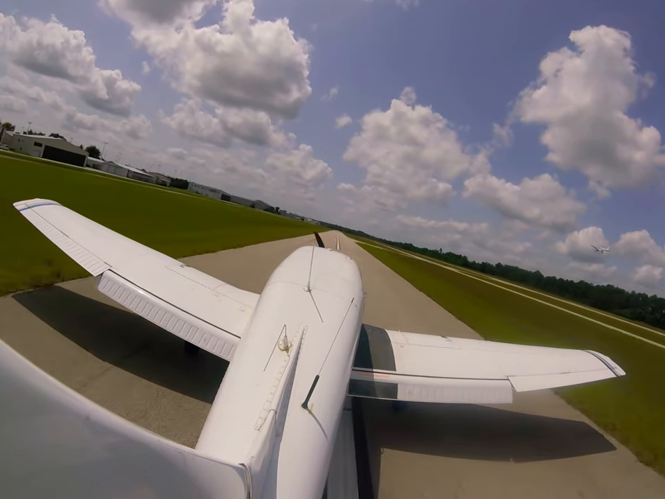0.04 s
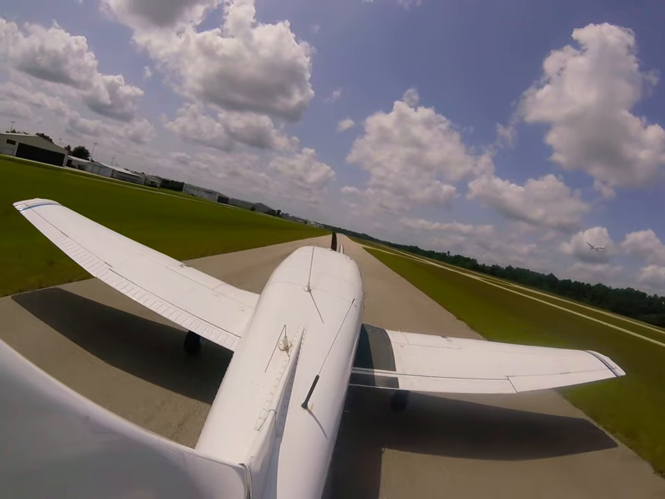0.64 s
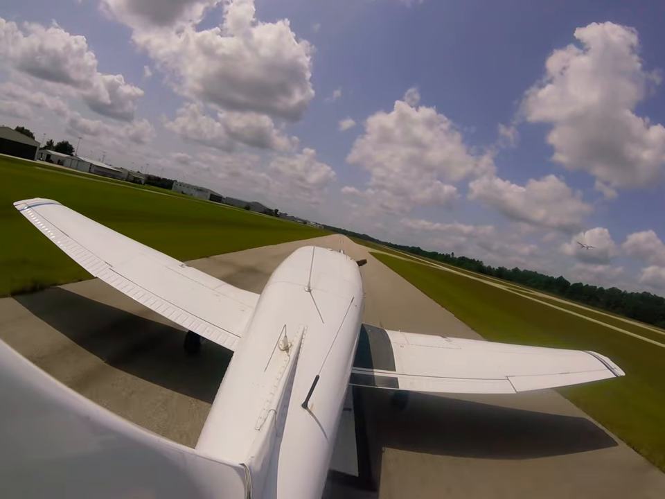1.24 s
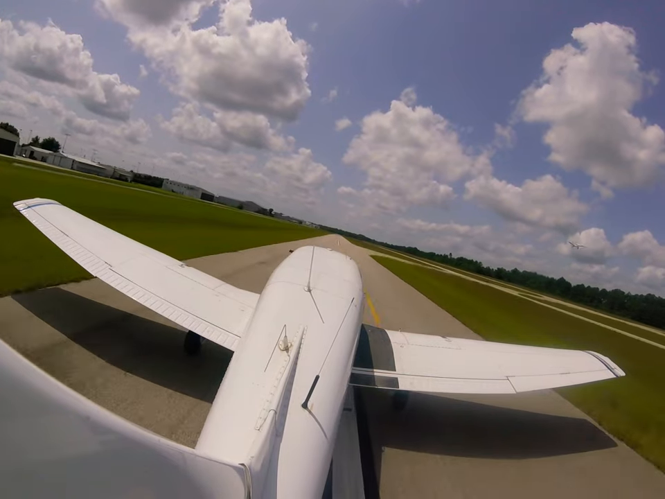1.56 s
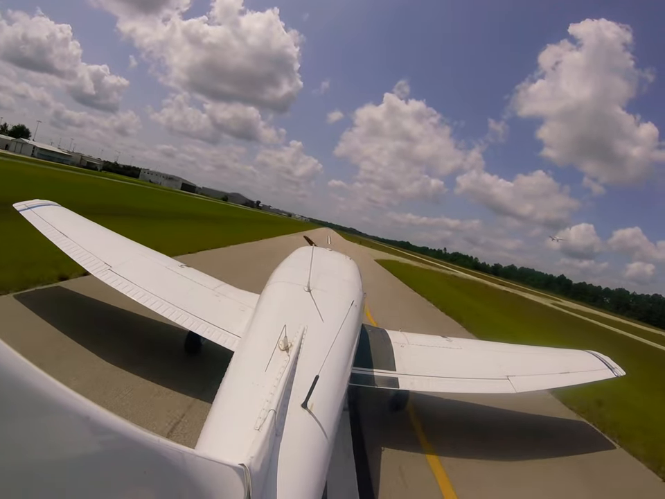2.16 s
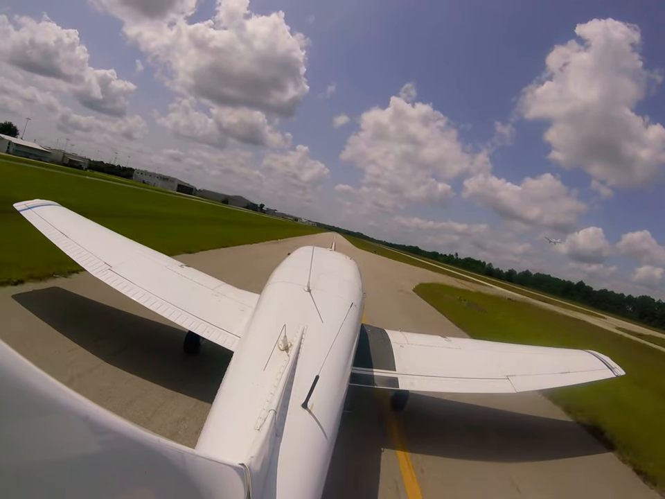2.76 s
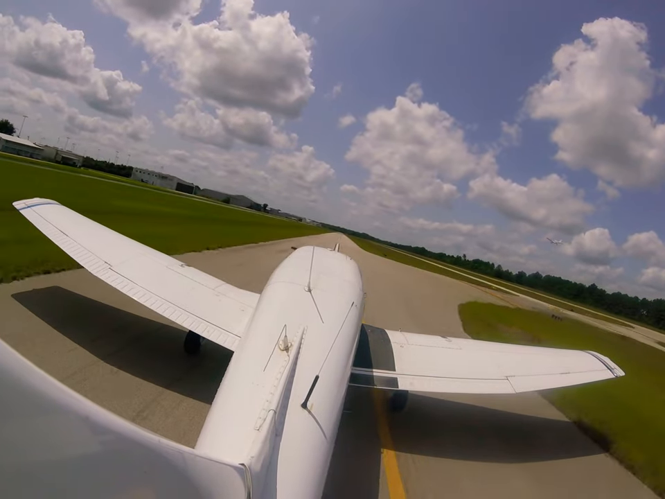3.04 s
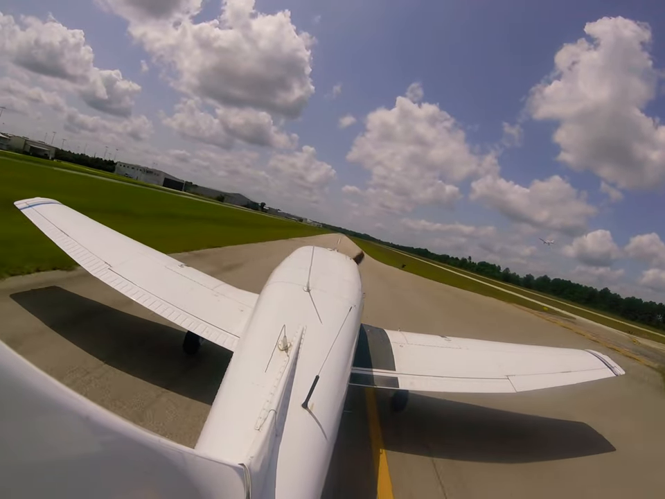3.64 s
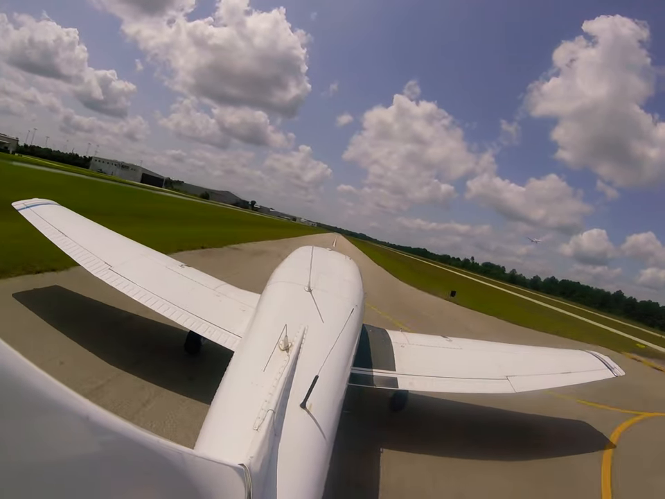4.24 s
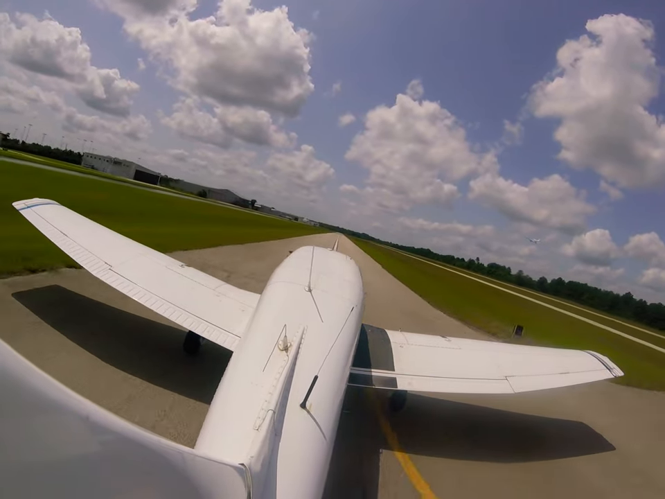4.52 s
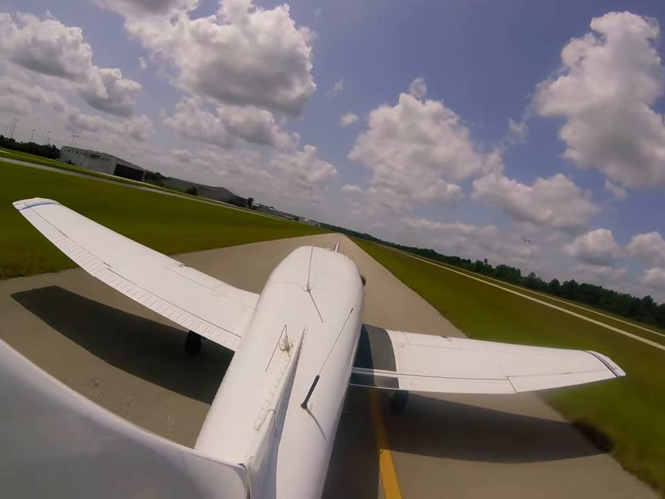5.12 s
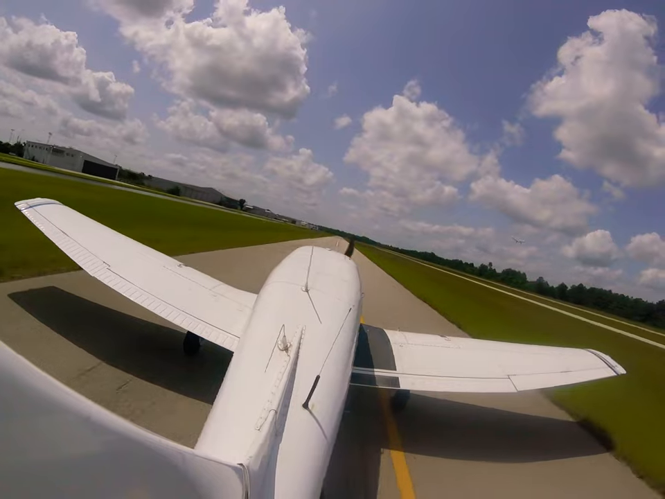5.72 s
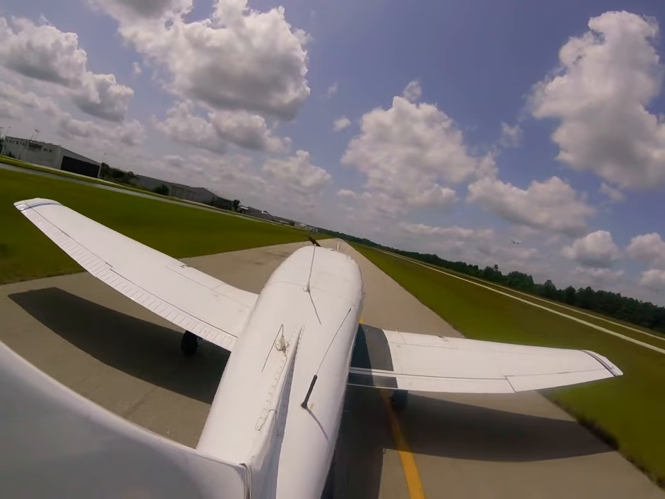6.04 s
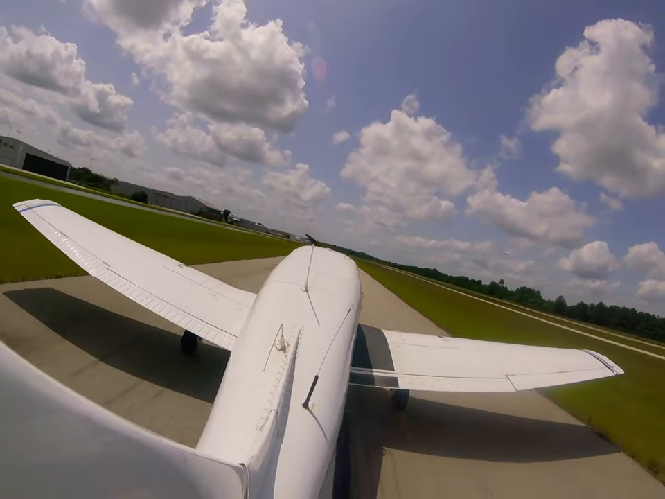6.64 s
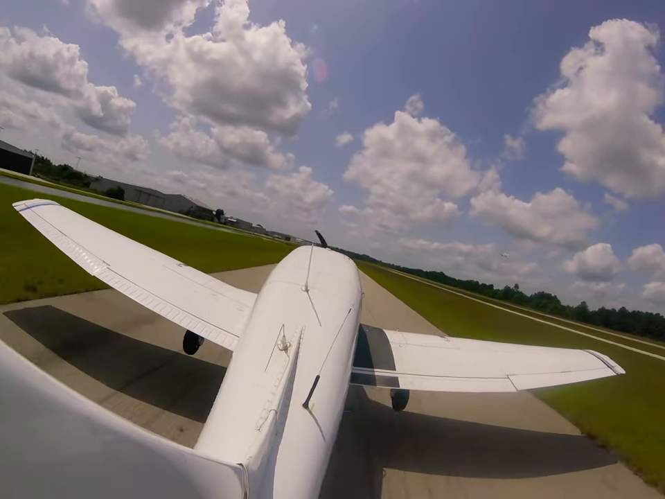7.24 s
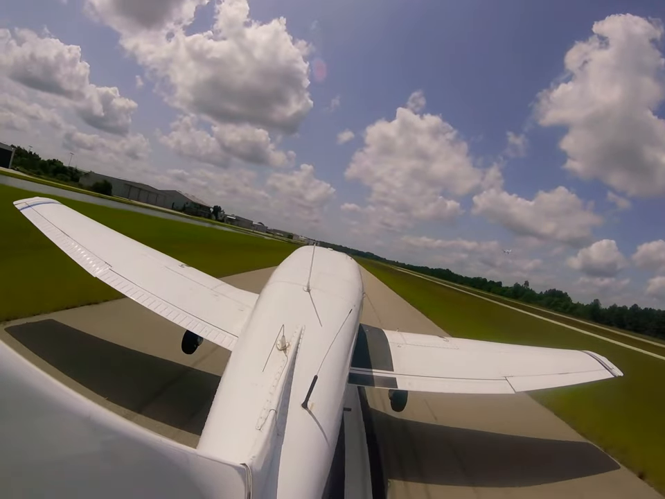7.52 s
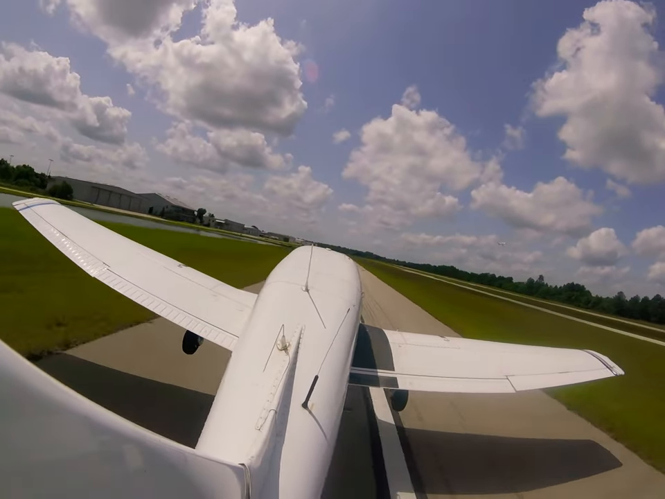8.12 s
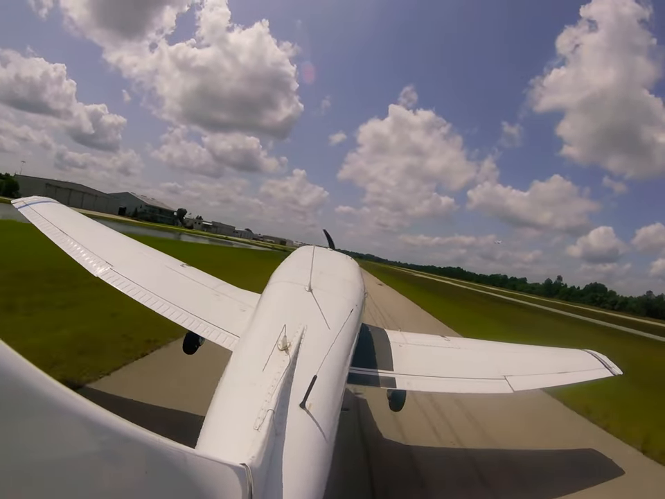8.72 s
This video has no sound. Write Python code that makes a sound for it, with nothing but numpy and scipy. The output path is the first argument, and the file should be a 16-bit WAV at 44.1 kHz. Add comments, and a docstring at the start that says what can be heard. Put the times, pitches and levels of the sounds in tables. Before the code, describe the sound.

Wind from a light plane's propeller rumbles and buffets the microphone, the engine droning underneath, until the slaps become a rapid flutter.

```python
"""On a runway, aboard a rolling light plane: one microphone on the tail, right in the propeller wash.
The wash roars past and the engine drones underneath. The swirl shed by each blade slaps the microphone:
at first only now and then, from about 6 s on almost every pass, as a hard flutter. Hard slaps crackle,
the airframe ticks faintly, and once the rushing air takes on a hollow pitch."""
import sys
import numpy as np
from scipy import signal
from scipy.fft import rfft, irfft, next_fast_len
from scipy.io import wavfile
from scipy.ndimage import uniform_filter1d

SR = 44100
rng = np.random.default_rng(int(sys.argv[2]) if len(sys.argv) > 2 else 0)


def store_wav(level_fs):
    """Save 16-bit WAV to argv[1]."""
    pcm = np.round(np.clip(np.atleast_2d(level_fs), -1, 1) * 32767)
    wavfile.write(sys.argv[1], SR, pcm.T.astype(np.int16))


N = 395577
TIME = np.arange(N) / SR

# roar of the wash at the tail: t/s, relative level/dB, share of the full, throaty kind/0-1
WASH_ROAR = [(0, -16, .6), (.06, -17, .6), (.13, -18, 0.61), (0.87, -16.5, 0.94), (1.17, -17.5, 0.72),
             (1.26, -19, 0.75), (1.32, -17, .9), (1.45, -18.5, .9), (1.75, -18, 0.81), (1.765, -22.5, 0.93),
             (1.8, -25, .93), (1.84, -20.5, 1), (1.91, -23.5, 1), (1.94, -20.5, 0.98), (2, -22, 0.89),
             (2.2, -19.5, 0.68), (2.31, -19, 0.85), (2.42, -23, 0.92), (2.475, -27.5, 0.8),
             (2.85, -28.5, 0.52), (3.25, -26, 0.28), (3.95, -29, 0.61), (4.15, -24.5, .5),
             (4.35, -30.5, 0.9), (4.8, -30.5, 0.76), (4.93, -27.5, .6), (5.12, -29, 0.55),
             (5.38, -24, 0.57), (5.62, -30.5, 0.44), (5.87, -32, 0.18), (6.2, -26, 0.094),
             (6.45, -29.5, .02), (6.68, -25.5, 0.019), (7.05, -29.5, 0.037), (7.65, -29, 0.045),
             (8.96, -26.5, 0.083)]
# swirls that hit the microphone squarely: t/s, slap level/dB, relative level of the hiss burst/dB
BUFFETS = [(1.744, -5.5, -34), (1.8082, -1, -23), (1.8282, -8.5, -38), (1.8505, -5.5, -33),
           (1.8568, -7, -38), (1.877, -5, -37), (1.9337, 0.5, -34), (2.375, -9.5, -45), (2.4215, -2.5, -46),
           (2.5116, -4.5, -29), (2.5259, -1.5, -29), (2.54, -6.5, -30), (2.628, -1.5, -24.5),
           (2.655, -6.5, -28), (2.6715, -3.5, -30), (2.686, -10.5, -39), (2.7133, -4.5, -40),
           (2.741, -3, -27), (2.782, -11, -49), (3.3166, -10, -35), (3.3695, -4.5, -39),
           (3.3964, -4.5, -42), (3.4954, -2, -35), (3.5192, -8, -40), (3.568, -7, -47), (3.5948, -2, -27),
           (3.6429, -2.5, -29), (3.6686, -6, -39), (3.6937, -4, -38), (3.7184, -4.5, -47),
           (3.7915, -5.5, -38), (3.8509, -3.5, -39), (3.8908, -3.5, -31), (3.939, -4, -29),
           (3.987, -3.5, -35), (4.0132, -9, -42), (4.0372, -6.5, -31.5), (4.085, -10.5, -34),
           (4.134, -5, -27), (4.182, -10.5, -28), (4.2287, -3, -26.5), (4.263, -8.5, -31),
           (4.302, -9, -28.5), (4.4923, -7.5, -45), (4.543, -5, -37), (4.5667, -3, -32.5),
           (4.59, -7.5, -42), (4.685, -13.5, -43), (4.855, -7.5, -43), (5.3454, -8.5, -37),
           (5.3867, -7.5, -34), (5.412, -6, -37), (5.444, -11, -38), (5.506, -10, -35), (5.5294, -6, -39),
           (5.5786, -0.5, -33), (5.6246, -8, -43), (5.6503, -4.5, -26), (5.6734, -3, -28),
           (5.6971, -3, -30), (5.7091, -3, -32.5), (5.7235, -4, -35), (5.749, -8.5, -29.5), (5.77, -2, -28),
           (5.842, -9, -45), (5.8645, -12.5, -45), (5.899, -8.5, -36), (5.9138, -7, -28),
           (5.9366, -.5, -28.5), (5.9478, -3.5, -35), (5.9614, -4, -39), (5.9855, -1.5, -36),
           (6.0327, -4, -30), (6.057, -1, -27), (6.0803, -5, -29.5), (6.1514, -5.5, -36),
           (6.1734, -5, -32.5), (6.1978, -2.5, -37), (6.471, -5.5, -30), (6.662, -2.5, -28),
           (6.89, -2.5, -32), (6.9735, -1.5, -30), (6.9854, -4.5, -31), (7.058, -3.5, -33),
           (7.0812, -4, -34), (7.2145, -2.5, -36), (7.3685, -3, -32), (7.392, -4.5, -34), (7.44, -4.5, -31),
           (7.4635, -3, -33), (7.7031, -6, -34), (7.8466, -4.5, -36), (7.8939, -2, -29),
           (8.2249, -3.5, -35), (8.6776, -3.5, -29), (8.7493, -3, -31)]


def gain_of(db):
    """Decibels to amplitude."""
    return 10 ** (np.asarray(db) / 20)


def unit_rms(x):
    """Scales to rms 1."""
    return x / np.sqrt(np.mean(x ** 2) + 1e-20)


def curve(rows, column=1, at=TIME):
    """One column of a table, joined by straight lines in time."""
    rows = np.asarray(rows)
    return np.interp(at, rows[:, 0], rows[:, column])


def coloured(x, spectrum):
    """Filters by a spectrum (f/Hz, level/dB), keeping the power of white noise."""
    size = next_fast_len(N + 4096)
    hz = np.fft.rfftfreq(size, 1 / SR)
    points_hz, db = np.transpose(spectrum)
    response = gain_of(np.interp(np.log(hz + 1), np.log(points_hz), db))
    return irfft(rfft(x, size) * unit_rms(response), size)[:N]


def wander(rate_hz):
    """Smooth random motion of rms 1, up to about the given rate."""
    size = 2 ** 19
    hz = np.fft.rfftfreq(size, 1 / SR)
    spectrum = rfft(rng.standard_normal(N), size) / (1 + (hz / rate_hz) ** 4)
    return unit_rms(irfft(spectrum)[:N])


def add_centred(mix, s, sound):
    """Adds a sound centred on time s."""
    start = round(s * SR) - len(sound) // 2
    part = mix[max(start, 0):max(start + len(sound), 0)]
    part += sound[max(-start, 0):][:len(part)]


def shaft_turns(blade_s=6.1748):
    """Turns of the propeller, counted from a moment when the stronger blade's swirl arrives."""
    shaft_speed = [(0, 42), (2.3, 36), (3.8, 40.9), (5.4, 41.4), (6, 42.1), (6.55, 42.05), (7, 41.6),
                   (7.4, 42), (7.7, 41.7), (8, 42.35), (8.3, 42), (9, 42)]  # propeller rotation: t/s, f/Hz
    turns = np.cumsum(curve(shaft_speed)) / SR
    return turns - np.interp(blade_s, TIME, turns)


def engine_drone(turns, waver_db=2, wobble_turns=.083):
    """Low orders of the engine and propeller up front; the louder the wash, the more it bends them."""
    shaft_orders = [(1, -14.5), (2, 5.5), (3, 3.5), (4, -3.5), (5, -19.5), (6, -28.5)]  # partials: multiple of the shaft speed, relative level/dB
    tone_levels = [(0, -33, -8), (0.7, -25.5, -18), (1.2, -17.5, -21), (1.5, -17, -12), (1.8, -37, -1),
                   (2.6, -29, -16.5), (3.3, -21.5, -10), (3.6, -29.5, 7), (4.25, -28, 6), (4.38, -28, -10),
                   (4.75, -23, -3), (4.92, -19, 4), (5.04, -23, -3), (5.15, -19, -6), (5.4, -17, 2),
                   (5.9, -36.5, 0), (6.25, -31, -1), (7.25, -29.5, -3), (7.6, -35, 0), (9, -34, 4)]  # drone: t/s, level/dB, blade unevenness on the odd orders/dB
    wobble = wobble_turns * gain_of(1.2 * (curve(WASH_ROAR) + 18))
    bent = turns + wobble * wander(12)
    uneven_db = curve(tone_levels, column=2)
    orders = [(round(k), gain_of(db + round(k) % 2 * uneven_db)) for k, db in shaft_orders]
    tone = sum(size * np.sin(2 * np.pi * k * bent) for k, size in orders)
    rms = np.sqrt(sum(size ** 2 for _, size in orders) / 2)
    return tone / rms * gain_of(curve(tone_levels) + waver_db * wander(37))


def propeller_wash(slaps, bursts, gust_hz=40, swell_hz=5, grain_hz=400):
    """Turbulent air on the microphone: gusts shake it, tiny eddies roughen the hiss, big ones thump."""
    hiss_levels = [(0, -33), (0.3, -36.5), (0.68, -33.5), (1, -35.5), (1.25, -36), (1.75, -36.5),
                   (1.775, -45), (1.8, -41), (1.85, -41.5), (2, -37.5), (2.33, -38), (2.49, -44.5),
                   (2.85, -45), (3.3, -39.5), (3.8, -44.5), (4.08, -46), (4.15, -42), (4.24, -46),
                   (4.4, -46.5), (5.42, -40.5), (5.55, -42), (5.61, -49), (5.7, -38), (5.84, -46.5),
                   (6.13, -43), (6.26, -33.5), (6.45, -44), (6.49, -35.5), (6.66, -33.5), (6.85, -36.5),
                   (7.13, -42.5), (7.3, -35), (7.6, -46.5), (8.03, -35), (8.22, -41), (8.42, -37.5),
                   (8.6, -43), (8.96, -37.5)]  # hiss of the wash at the tail: t/s, relative level/dB
    rumble_levels = [(0, -23.5), (.34, -19), (.6, -20.5), (1.4, -17), (1.68, -19), (1.85, -21.5),
                     (2.1, -23.5), (2.74, -19.5), (2.8, -27), (3.1, -23), (3.35, -21), (3.7, -21.5),
                     (4.05, -22.5), (4.25, -20.5), (4.4, -26.5), (5.2, -27.5), (5.52, -18.5), (5.61, -32.5),
                     (5.7, -19), (5.83, -22.5), (6.2, -20), (7.1, -18.5), (7.4, -20.5), (8.2, -21.5),
                     (8.96, -21)]  # big eddies on the microphone: t/s, level/dB
    gustiness = [(0, 0.5), (2.3, .65), (2.6, 1)]  # the wash turns gusty as it thins: t/s, flicker depth/0-1
    # spectra of the rumble, the two kinds of roar and the hiss: f/Hz, relative level/dB
    rumble_colour = [(10, -34), (22, -12), (38, 6), (60, 1.5), (100, 2.5), (170, -2.5), (260, -6),
                     (400, -18.5), (900, -39), (3000, -87.5)]
    throaty_colour = [(20, -27), (100, -0.5), (190, 2), (350, -1), (600, -2), (1000, -8), (1500, -14.5),
                      (2000, -19.5), (3000, -31), (4200, -47), (9000, -88)]
    thin_colour = [(20, -20), (100, 4), (200, -7.5), (400, -1.5), (600, -5), (900, -7.5), (1500, -17),
                   (2000, -27), (3000, -37), (4200, -54), (9000, -81.5)]
    hiss_colour = [(100, -17.5), (500, -1.5), (1000, 5.5), (2000, 1.5), (3000, -5.5), (3700, -11),
                   (4250, -15.5), (5200, -9.5), (6000, -15), (7200, -22), (9000, -37), (10200, -43.5),
                   (12000, -64)]
    low, mid, high = rng.standard_normal((3, N))
    gust = wander(gust_hz) * curve(gustiness)
    swell = wander(swell_hz)
    trail = rough_air()

    roar = np.hypot(gain_of(curve(WASH_ROAR) + 2), trail * gain_of(-25)) * gain_of(1.32 * gust)
    stir = gain_of(-16) * uniform_filter1d(abs(slaps), size=90)  # each swirl stirs up turbulence
    roar = mid * np.hypot(roar, stir)
    throaty = np.clip(curve(WASH_ROAR, column=2), 0, 1)
    roar = coloured(roar * throaty, throaty_colour) + coloured(roar * (1 - throaty), thin_colour)

    hiss = np.hypot(gain_of(curve(hiss_levels) + 5), trail * gain_of(-33.5))
    hiss *= gain_of(1.6 * gust + .12 * swell)
    hiss = high * np.hypot(hiss, bursts * gain_of(2)) * gain_of(1.92 * wander(grain_hz))

    rumble = np.hypot(gain_of(curve(rumble_levels)), trail * gain_of(-23.5))
    rumble *= low * gain_of(2.5 * gust + 3 * swell)
    return coloured(rumble, rumble_colour) + roar + coloured(hiss, hiss_colour)


def swirls(rows, puff_s=.0025, suction=.66, suction_width=.85, release=1.01, soft_hz=4000, drain_hz=13):
    """Vortices (t/s, slap size, hiss size) suck, then push; gives the slaps and their hiss envelope."""
    breadth = [(1.8, 0.0006), (1.93, .00075), (2.45, 0.0012), (2.712, 0.0016), (2.741, 0.0024),
               (2.782, .0013), (3.6, 0.0015), (4.2, .0012), (4.55, 0.0014), (6.2, 0.0013), (6.72, 0.002),
               (6.95, 0.0014), (7.25, 0.0015), (8.03, 0.0013), (8.3, 0.0012)]  # breadth of the swirls: t/s, rise time of the pressure/s
    t = np.arange(-700, 701) / SR
    puff = np.exp(-((t + .0003) / puff_s) ** 2 / 2)
    slaps, bursts = np.zeros(N), np.zeros(N)
    for s, size, hiss in rows:
        age = t / curve(breadth, at=s)
        before, after = np.maximum(-age, 0) / suction_width, np.maximum(age, 0)
        pull = suction * before * np.exp((1 - before ** 2) / 2)
        push = after * np.exp((1 - after ** release) / release)
        add_centred(slaps, s, size * (push - pull))
        add_centred(bursts, s, hiss * puff)
    slaps = signal.lfilter(*signal.butter(2, soft_hz, fs=SR), slaps)  # a soft core rounds the flip
    # the microphone does not hold slow pressure, so each slap undershoots
    return signal.lfilter(*signal.butter(1, drain_hz, "high", fs=SR), slaps), bursts


def buffet_slaps():
    """Square hits on the microphone: a few at a time as the wash wanders, later the hardest beats."""
    return swirls([(s, gain_of(db), gain_of(hiss_db)) for s, db, hiss_db in BUFFETS], puff_s=.0014)


def rough_air(rise_s=.0024, decay_s=.012):
    """Strength of the turbulence that springs up with each buffet and fades behind it."""
    t = np.arange(-4000, 4001) / SR
    patch = np.exp(np.minimum(t / rise_s, -t / decay_s))
    power = np.zeros(N)
    for s, db, _ in BUFFETS:
        add_centred(power, s, gain_of(db) ** 2 * patch)
    return np.sqrt(power)


def crackles(scatter_db=1.2, lead_s=.0016, decay_s=.0009):
    """A tiny bright crackle sounds just ahead of each hard slap."""
    crackle_colour = [(300, -14), (3000, -2), (4200, -6.5), (5500, 2.5), (8000, -5.5), (10000, -12),
                      (12300, -16.5)]  # spectrum of the crackle: f/Hz, relative level/dB
    t = np.arange(-300, 301) / SR
    crack = np.exp(-abs(t) / decay_s)
    out = np.zeros(N)
    for s, slap_db, _ in BUFFETS:
        size = gain_of(-40.5 + 3 * slap_db + scatter_db * rng.standard_normal())
        add_centred(out, s - lead_s, size * crack * rng.standard_normal(len(t)))
    return coloured(out, crackle_colour)


def airframe_ticks(trim_db=-9, decay_s=.0009):
    """Faint dry rattles of the airframe, each a very short crack."""
    ticks = [(1.757, -9.5), (2.421, -10), (2.461, -14), (2.6612, -7.5), (2.7187, -18), (3.551, -20),
             (3.894, -12), (4.1827, -12.5), (5.647, -11), (8.223, -21)]  # rattles: t/s, relative level/dB
    tick_colour = [(200, 6.5), (1200, 8), (3000, 4), (4200, -7.5), (5300, -5.5), (8000, -13), (12000, -43)]  # their spectrum: f/Hz, relative level/dB
    t = np.arange(-300, 301) / SR
    crack = (t >= 0) * np.exp(-abs(t) / decay_s)
    out = np.zeros(N)
    for s, db in ticks:
        add_centred(out, s, gain_of(db + trim_db) * crack * rng.standard_normal(len(t)))
    return coloured(out, tick_colour)


def glancing_slaps(turns, from_s=3.25, until_s=5.6, share=.4, level_db=-21, scatter_db=2.2):
    """On a share of the turns a weak swirl only grazes the microphone."""
    s = np.interp(np.arange(1, int(turns[-1]) + 1), turns, TIME)
    spread = rng.standard_normal(400)[:len(s)]
    grazes = (rng.random(400)[:len(s)] < share) & (s > from_s) & (s < until_s)
    size = gain_of(level_db + scatter_db * spread) * grazes
    return swirls(zip(s, size, size * gain_of(-26)))


def blade_flutter(turns, from_s=6.203, lag_turns=(0, .475), scatter_db=1.2, same_swirl_s=.006):
    """Two swirls a turn hit the microphone, one per blade, each varying in size, timing and hiss."""
    blade_levels = [(6.21, -3.5, -6.5), (6.25, -10.5, -5.5), (6.32, -3.5, -9.5), (6.39, -11.5, -3.5),
                    (6.43, -8.5, -7), (6.455, -26.5, -19), (6.484, -3.5, -7), (6.6, -5, -11),
                    (6.71, -14, -9.5), (6.82, -12, -9), (6.95, -5, -7.5), (7.02, -7, -15.5),
                    (7.13, -4, -11.5), (7.22, -11, -6), (7.36, -2.5, -10.5), (7.47, -9.5, -24),
                    (7.585, -5.5, -8.5), (7.624, -16, -18), (7.69, -11.5, -15), (7.82, -4.5, -20.5),
                    (7.95, -3, -4), (8.03, -11.5, -8.5), (8.2, -3, -12), (8.301, -6.5, -9.5),
                    (8.43, -4.5, -6), (8.52, -4.5, -11), (8.62, -5, -5), (8.72, -6.5, -12.5),
                    (8.9, -3, -9.5), (8.96, -5, -11)]  # swirl train: t/s, relative level/dB of the first blade, of the second
    jitter = [(6.2, .0006), (7, .00045), (7.9, .0004), (8.25, .00014)]  # steadier as the wash lines up with the tail: t/s, timing scatter/s
    whole_turns = np.arange(1, int(turns[-1]) + 1)
    buffet_times = np.transpose(BUFFETS)[0]
    rows = []
    for blade, lag in enumerate(lag_turns, 1):
        size, late, fizz = rng.standard_normal((len(whole_turns), 3)).T
        s = np.interp(whole_turns + lag, turns, TIME)
        s += late * curve(jitter, at=s)
        db = curve(blade_levels, blade, at=s) + .46 + scatter_db * np.clip(size, -2, 1.5)
        hiss = gain_of(db - 28.5 + scatter_db * fizz)
        to_buffet_s = abs(s[:, None] - buffet_times).min(axis=1)
        plays = (s > from_s) & (to_buffet_s > same_swirl_s)  # a buffet takes that swirl's place
        rows += zip(s[plays], gain_of(db[plays]), hiss[plays])
    return swirls(rows)


def air_hoot(s=6.71, spread_s=.05, pitch_hz=590, width_hz=80, level_db=-27):
    """For a moment the rushing air takes on a hollow pitch."""
    edges_hz = [pitch_hz - width_hz / 2, pitch_hz + width_hz / 2]
    band = signal.butter(2, edges_hz, "band", fs=SR, output="sos")
    air = unit_rms(signal.sosfilt(band, rng.standard_normal(N)))
    return air * gain_of(level_db) * np.exp(-((TIME - s) / spread_s) ** 2 / 2)


def scene():
    """Everything that reaches the one microphone on the tail."""
    turns = shaft_turns()
    slaps, bursts = np.sum([buffet_slaps(), glancing_slaps(turns), blade_flutter(turns)], axis=0)
    mix = slaps + engine_drone(turns) + propeller_wash(slaps, bursts)
    return (mix + air_hoot() + airframe_ticks() + crackles())[None]


def record(dry):
    """Overload rounds off the strongest slaps; a low-pass cuts the top treble."""
    ceiling, hardness, edge_hz = .92, 14, 12800
    rounded = dry / (1 + (dry / ceiling) ** hardness) ** (1 / hardness)
    low_pass = signal.firwin(511, edge_hz, window=("kaiser", 9), fs=SR)
    return signal.oaconvolve(rounded, low_pass[None], "same")


dry = scene()
out = record(dry)
store_wav(out)
```